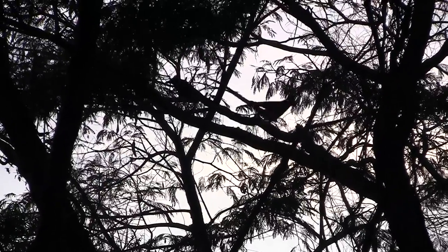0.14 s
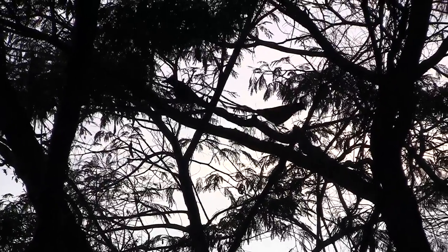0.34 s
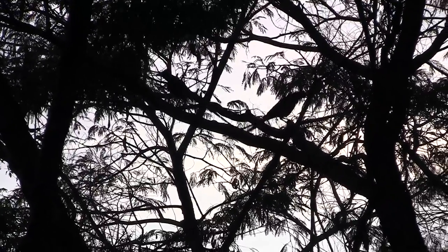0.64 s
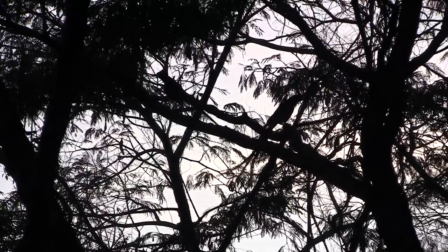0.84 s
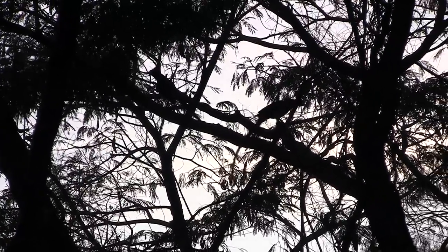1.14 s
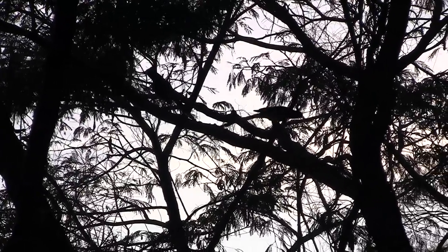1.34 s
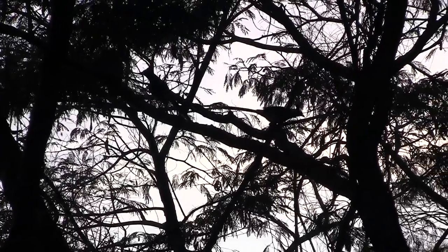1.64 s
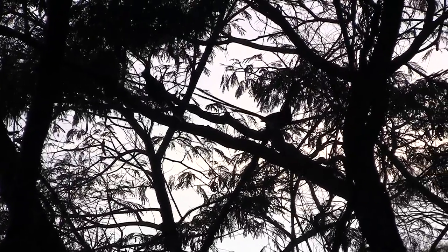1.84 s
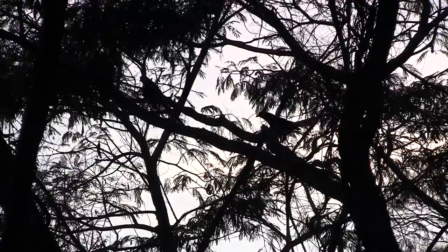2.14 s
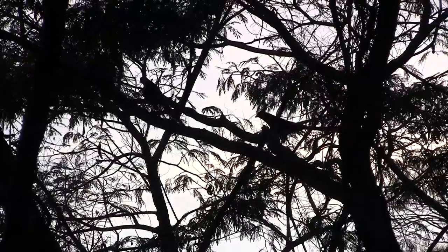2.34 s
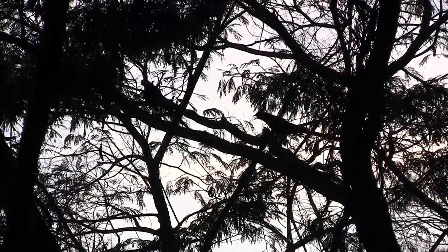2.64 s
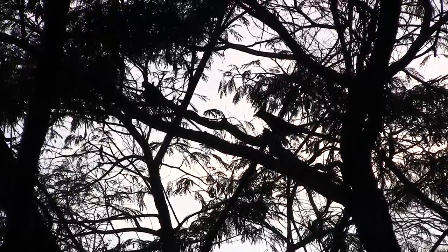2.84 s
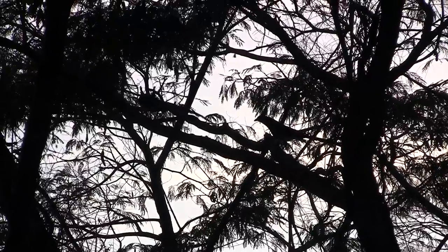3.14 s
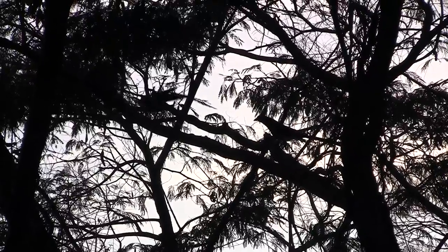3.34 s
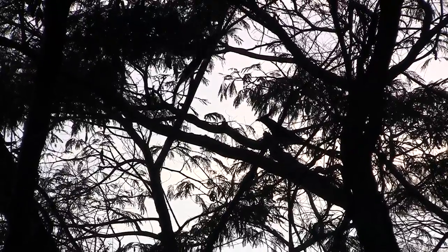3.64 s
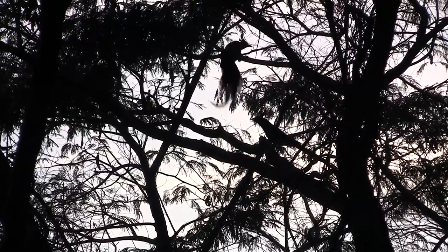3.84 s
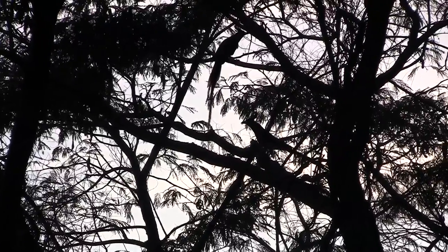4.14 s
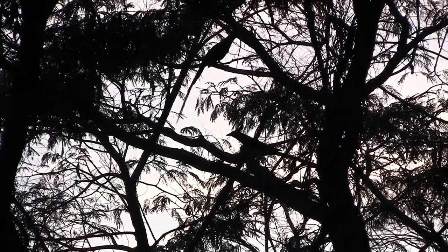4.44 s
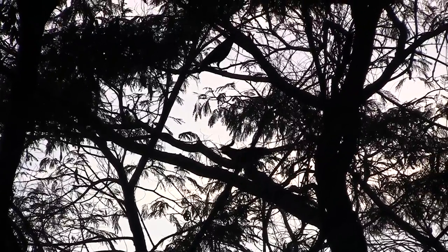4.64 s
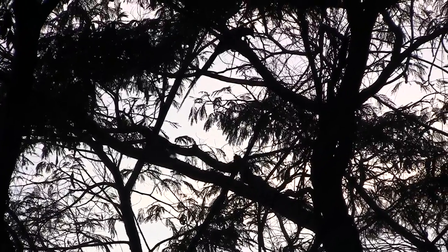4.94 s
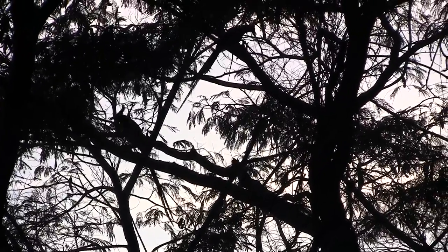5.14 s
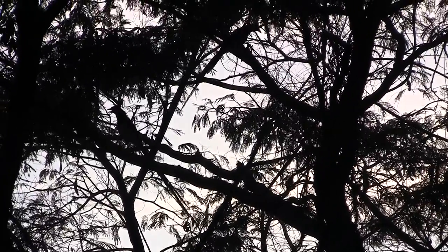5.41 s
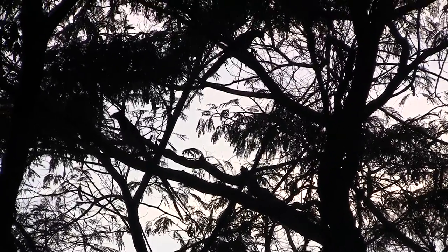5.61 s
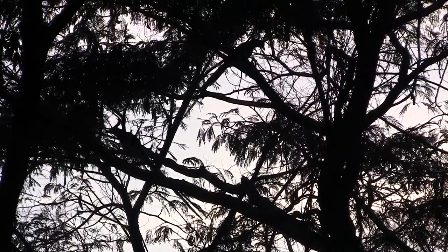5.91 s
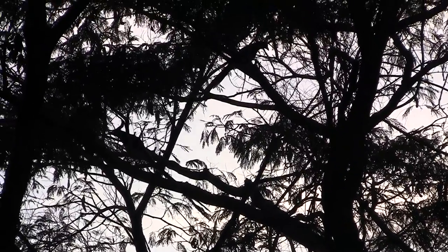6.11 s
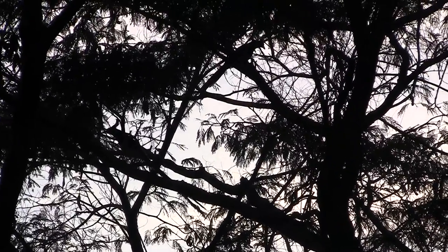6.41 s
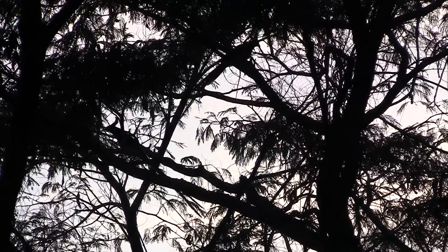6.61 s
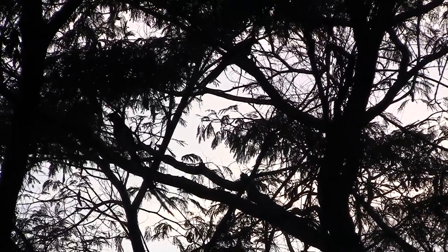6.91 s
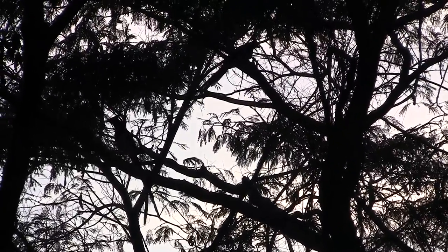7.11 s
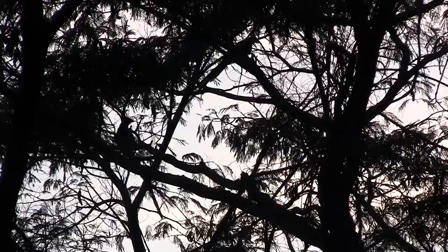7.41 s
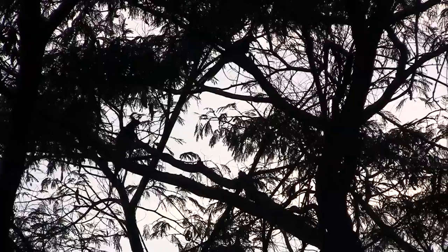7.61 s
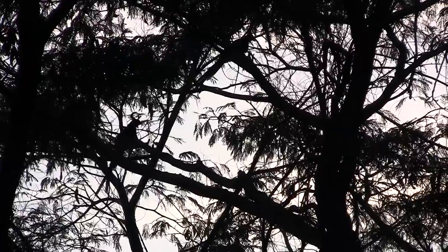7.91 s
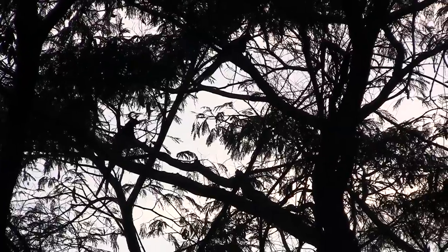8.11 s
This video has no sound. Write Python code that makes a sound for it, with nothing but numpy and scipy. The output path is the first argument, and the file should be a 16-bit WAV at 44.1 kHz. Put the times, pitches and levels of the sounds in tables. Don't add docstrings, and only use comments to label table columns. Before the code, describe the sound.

A bird gives short harsh squawks every second or so among trees, with faint far metallic clanks and a soft outdoor hush.

```python
import sys
import numpy as np
from scipy import signal
from scipy.fft import rfft, irfft, next_fast_len
from scipy.io import wavfile
from scipy.ndimage import uniform_filter1d, map_coordinates

SR = 44100
rng = np.random.default_rng(int(sys.argv[2]) if len(sys.argv) > 2 else 0)


def store_pcm(level_fs):
    pcm = np.round(np.clip(level_fs, -1, 1) * 32767).astype(np.int16)
    wavfile.write(sys.argv[1], SR, np.atleast_2d(pcm).T)


def magnitude_from_level(level_db):
    exponent = np.asarray(level_db, float) / 20
    return 10 ** exponent


N = 364266


def unit(x):
    return x / np.sqrt(np.mean(x ** 2) + 1e-20)


def along(points, hz):
    f, v = np.transpose(points)
    return np.interp(np.log(hz + 1), np.log(f + 1), v)


def filtered(x, response):
    size = next_fast_len(x.shape[-1] + 4096)
    spectrum = rfft(x, size) * response(np.fft.rfftfreq(size, 1 / SR))
    return irfft(spectrum, size)[..., :x.shape[-1]]


def resonances(modes):
    def mode(f, hz, width, db):
        return magnitude_from_level(db) * 1j * f * width / (hz * hz - f * f + 1j * f * width)
    return lambda f: sum((-1) ** k * mode(f, *settings) for k, settings in enumerate(modes))


def steep(low_hz, high_hz):
    return lambda f: (1j * f / low_hz / (1 + 1j * f / low_hz) / (1 + 1j * f / high_hz)) ** 4


def moving_resonance(x, hz, width_hz):
    turn = np.exp(2j * np.pi * np.cumsum(hz) / SR)
    keep = np.exp(-np.pi * width_hz / SR)
    return np.real(signal.lfilter([1], [1, -keep], x / turn) * turn)


def add(out, x, s):
    at = round(s * SR)
    x = x[:, max(-at, 0):N - at]
    out[:, max(at, 0):][:, :x.shape[1]] += x


def sides(pan_db):
    return magnitude_from_level(np.array([pan_db / 2, -pan_db / 2]).reshape(2, -1))


def hush():
    # (f/Hz, level/dB per Hz)
    air_curve = [(15, -62), (25, -26), (48, -15), (80, -9.5), (188, -2), (340, -3.5), (742, -8),
                 (804, -9.5), (872, -8.5), (1020, -10.5), (6050, -20.5), (14300, -33), (15500, -43)]
    air = filtered(rng.standard_normal((2, N)), lambda f: magnitude_from_level(along(air_curve, f)))
    air[0] += 0.088 * air[1]
    breathing_db = 0.5 * map_coordinates(rng.standard_normal(size=30), [np.arange(N) * 3 / SR])
    return magnitude_from_level(-55 + 3 + breathing_db) * unit(air) * sides(-0.78)


def clanks(out):
    # (t/s, ring level/dB, spray level/dB, tilt/dB per octave, t60/s)
    taps = [(0.5275, -43, -41.5, -0.7, 0.28), (0.861, -52, -43.5, 0.5, 0.23), (1.302, -47, -44, -2, 0.4),
            (3.635, -55.5, -43, 0, 0.25), (4.2085, -44, -47, -2, 0.19), (6.2509, -49, -42.5, 3, 0.27),
            (6.784, -47, -47.5, .1, 0.26), (7.396, -49.5, -47, -1, 0.18), (.897, -62, -52, 10, .04),
            (3.803, -58, -51, 2, 0.11), (6.699, -58, -51.5, -3, 0.1)]
    # (f/Hz, level/dB)
    metal = [
        [(1490, -1.5), (2050, 3.5), (3340, -2), (5700, -4), (7860, -3)],
        [(3430, 9), (4280, 7), (7870, -11)],
        [(2390, -2), (5400, 8)],
        [(1490, 5), (2050, 12), (3340, 5.5), (4280, 4.5), (7870, 5)],
        [(991, -2), (1530, -0.5), (2750, -11), (3980, -3), (5380, 3)],
        [(2390, 4), (3330, 9), (4280, 9.5), (5420, -9), (7870, -18)],
        [(2270, 1), (3350, -7), (4660, -6), (7780, -4)],
        [(991, -1), (1520, 3.5), (2090, 1), (3840, -1), (5380, 3.5)],
        [(11300, 5)],
        [(7300, 4)],
        [(3650, .1)],
    ]
    # (f/Hz, level/dB per Hz)
    spray_curve = [(500, -22), (1200, -6), (3000, -3), (5000, -6.5), (8000, -14), (12000, -18),
                   (15500, -33)]
    t = np.arange(SR // 2) / SR

    def blur():
        return np.cumsum(rng.normal(0, 0.012, (2, len(t))), axis=1) + rng.random((2, 1))

    for (s, ring_db, spray_db, tilt_db, t60), modes in zip(taps, metal):
        spray = rng.standard_normal((3, len(t)))
        spray = spray[1:] + 0.77 * spray[0]
        tilted = lambda f: magnitude_from_level(along(spray_curve, f) + tilt_db * np.log2(f / 3000 + 0.1))
        broad = unit(filtered(spray, tilted))
        ring = 0
        for hz, db in modes:
            dying = magnitude_from_level(db - 0.019 * hz * t)
            ring = ring + dying * np.sin(2 * np.pi * (hz * t + blur()))
        shape = magnitude_from_level(-60 * t / t60) * (1 - np.exp(-t / (0.0059 * t60)))
        clank = shape * (magnitude_from_level(ring_db) * ring + magnitude_from_level(spray_db) * broad)
        add(out, clank * sides(0.8), s)


def bumps(out):
    # (t/s, peak level/dB, f/Hz, left-right/dB)
    touches = [(.163, -42, 80, 11), (2.238, -47, 120, 9), (2.265, -44, 90, 9), (2.457, -32.5, 101, 9),
               (2.49, -44, 100, 12), (2.526, -43, 100, 13), (3.191, -36, 107, 8), (3.329, -35, 96, 14),
               (3.983, -42.5, 84.4, 10)]
    t = np.arange(SR // 20) / SR
    for s, db, hz, pan_db in touches:
        u = t * hz / 0.87
        push = u * np.exp(1 - u ** 1.6) * np.sin(2 * np.pi * hz * t)
        add(out, magnitude_from_level(db) * push * magnitude_from_level([[0], [-pan_db * 2.0]]), s - 0.006)


def tick(out):
    bright = lambda f: 0.3 + 1j * f / 6000 / (1 + 1j * f / 6000)
    click = filtered(np.eye(1, 200)[0], bright)
    add(out, magnitude_from_level(-34) * click * sides(8), 6.3345)


def tail(t60, level, size):
    hz, t, z = signal.stft(rng.standard_normal((2, size)), SR, nperseg=256)
    field = signal.istft(z * magnitude_from_level(-60 * t / t60(hz)[:, None]), SR, nperseg=256)[1]
    return filtered(field / np.linalg.norm(field[0]), lambda f: magnitude_from_level(along(level, f)))


def among_trees(voice, pan_db, wood_db=0):
    # (f/Hz, level/dB)
    leaf_curve = [(700, -19), (1500, -5.5), (2500, -7.5), (3500, 6), (6000, -2.5), (14000, 0.5)]
    # (f/Hz, t60/s)
    wood_t60 = [(500, 0.11), (1500, 0.6), (2250, 1.25), (2600, 1.1), (2950, 0.9), (5000, 0.67),
                (10000, 0.55)]
    # (f/Hz, level/dB)
    wood_curve = [(700, -4), (1500, -16), (2250, -21.5), (2600, -21), (2950, -13), (4200, 0), (6000, -10),
                  (8000, -12), (14000, -5)]
    voice = np.pad(voice, (0, SR))
    pan_db = np.pad(pan_db, (0, SR), "edge")
    near = tail(lambda hz: 0.053 + 0 * hz, leaf_curve, size=4096)
    near = near[0] * np.array([[1], [-1]]) + 0.69 * near[1]
    far = tail(lambda hz: along(wood_t60, hz), wood_curve, size=SR)
    far = np.pad(far, ((0, 0), (round(0.0086 * SR), 0)))
    echo = lambda field: signal.fftconvolve(voice[None], field, axes=1)[:, :len(voice)]
    return (voice + echo(near)) * sides(pan_db) + magnitude_from_level(wood_db) * echo(far) * sides(3.8)


def notes(out):
    # (t/s, level/dB)
    openings = [(1.32, -47.5), (2.745, -47.5), (3.845, -47), (4.743, -44), (5.56, -44.5), (6.951, -46.5)]
    # (t/s, end f/Hz, level/dB)
    closings = [(.026, 823, -43), (1.433, 476, -41.5), (2.854, 546, -39.5), (3.951, 467, -45),
                (4.848, 533, -42), (5.675, 525, -39)]
    # (t/s, length/s, start f/Hz, end f/Hz, level/dB)
    others = [
        (0.646, 0.035, 859, 930, -42.5),
        (0.722, 0.055, 1067, 930, -44),
        (.768, 0.02, 823, 423, -47.5),
        (4.059, 0.07, 790, 1540, -49.5),
        (7.118, 0.017, 1150, 1165, -39),
    ]
    rising = [(s, 0.016, 725, 990, db) for s, db in openings]
    falling = [(s, 0.028, 990, to_hz, db) for s, to_hz, db in closings]
    for s, length, from_hz, to_hz, db in rising + falling + others:
        u = np.arange(0, 1, 1 / (length * SR))
        phase = 2 * np.pi * np.cumsum(from_hz + (to_hz - from_hz) * u ** 1.755) / SR
        tone = np.sin(phase) + magnitude_from_level(-26) * np.sin(2 * phase)
        note = magnitude_from_level(db + 2) * np.sin(np.pi * u) ** 0.072 * tone
        add(out, among_trees(note, 0 * u)[:, :SR // 2], s)


def evened(x, amount, size=500):
    strength = np.sqrt(np.abs(uniform_filter1d(x ** 2, size=size)) + 1e-9)
    return unit(x / strength ** amount)


def flutter(size, rate_hz, jitter, scatter_db, breath):
    draw = rng.standard_normal((size // 5, 2))
    at = np.cumsum(SR / rate_hz * np.exp(jitter * draw[:, 0])).astype(int)
    slaps = np.bincount(at, magnitude_from_level(scatter_db * draw[:, 1]), size)[:size]
    gate = signal.lfilter([1], [1, -np.exp(-1 / (0.0024 * SR))], slaps)
    turbulence = unit(gate * rng.standard_normal(size))
    return evened(unit(slaps - slaps.mean()) + breath * turbulence, amount=0.34, size=130)


def controls(t, length, effort_db, attack, release, throat_hz, dip, rise, strain_db, swell_db):
    u = np.clip(t / length, 0, 1)
    letting_go = np.clip((t - length) / release, 0, 1)
    early_db = 18.5 * np.clip(1 - t / attack, 0, 1) ** 1.9
    late_db = 22 * letting_go ** 0.73
    weak_db = early_db + late_db
    strain = np.clip(1 - np.abs(u - 0.51) / 0.39, 0, 1)
    push_db = strain_db * strain
    effort = effort_db + swell_db * (u - 0.5) - weak_db - 0.33 * push_db
    bend_percent = rise * u - dip * strain + 0.32 * early_db + 0.17 * late_db
    throat = throat_hz * (1 + bend_percent / 100)
    chest = -16.5 + 0.98 * push_db + 0.34 * weak_db
    rasp = -10.5 + 0.62 * push_db + 0.18 * weak_db
    pan = 3.5 - 0.13 * push_db - 9 * letting_go
    lip = 2.2 * push_db + 0.55 * weak_db - 17 * u
    ring = -8.5 - 0.66 * push_db
    return effort, throat, chest, rasp, pan, lip, ring


def squawks(out):
    # (t/s, sounding until release/s, effort level/dB, attack/s, release/s)
    calls = [
        (-.09, .13, -21, .03, 0.02),
        (.643, 0.088, -18.5, 0.054, 0.05),
        (1.318, 0.12, -19, 0.027, .036),
        (2.743, 0.11, -21.5, .032, 0.04),
        (3.839, 0.11, -18, 0.041, 0.038),
        (4.739, 0.12, -19.5, 0.028, 0.013),
        (5.559, .11, -17, 0.033, 0.042),
        (6.946, 0.18, -18.5, 0.027, 0.032),
    ]
    # (f/Hz, dip under strain/%, rise to the end/%, mid-call strain/dB, swell/dB)
    throats = [(2436, .1, -0.3, 3.7, -7), (2553, 7.6, -1.5, 1.1, 3), (2578, 6.5, 2, 2.5, 1.8),
               (2625, 3.5, -2.5, 10, 2), (2590, 0.7, -0.5, 5.5, 2), (2503, 3.5, 0, 11, 1),
               (2518, 9.5, 7, 4.5, 2.5), (2647, 6, -8, 9.5, -3.5)]
    # (windpipe f/Hz, windpipe level/dB, shoulder f/Hz, shoulder level/dB, lip level/dB)
    gapes = [(930, 3, 2970, -14.5, -3), (927, 4, 2740, -11, -16), (930, -0.5, 2200, -20.5, -14),
             (893, 3, 2720, -5, -18), (930, -1.5, 2400, -13, -15), (893, 0, 2980, -13.5, -14.5),
             (930, -0.5, 3040, -13.5, -7), (1150, 5, 1910, -7.5, -14)]
    # (f/Hz, lift/dB, facing/dB per octave, level into the wood/dB, rasp level/dB)
    beaks = [(4930, 4, 2, 0.2, 0.5), (6300, 5.5, 0.2, -0.5, 0.5), (5950, 6.5, -0.7, 0.1, 2),
             (4870, 5.5, -1, -0.1, 3.5), (4730, 7, 1.5, 1.4, -0.8), (5800, 5, 1.5, 0.9, -2.5),
             (5140, 5.5, 0.3, 0.7, -1), (6460, 2.5, -3.5, 0.5, 1.5)]
    # (f/Hz, width/Hz, level/dB)
    chest_mode = [(1372, 134, 0.1)]
    # (f/Hz, width/Hz, level/dB)
    lip_mode = [(2057, 114, 0.1)]
    # (f/Hz, level/dB per Hz)
    rasp_curve = [(2240, -29), (3800, 3), (4220, -2), (5310, 4), (6610, 3), (7210, -1), (8810, -4),
                  (9850, -14.5), (11600, -14.5), (13500, -33), (14800, -36), (15500, -51)]
    t = np.arange(SR // 4) / SR
    through = lambda x, modes: unit(filtered(x, resonances(modes)))

    for (start, *call), bend, gape, beak in zip(calls, throats, gapes, beaks):
        pipe_hz, pipe_db, shoulder_hz, shoulder_db, mouth_db = gape
        beak_hz, lift_db, tilt_db, wood_db, harsh_db = beak
        effort_db, throat_hz, chest_db, rasp_db, pan_db, lip_db, ring_db = controls(t, *call, *bend)
        drive = flutter(len(t), rate_hz=1500, jitter=0.5, scatter_db=1.0, breath=1.42)

        throat = moving_resonance(drive, throat_hz, width_hz=300)
        throat = moving_resonance(throat, throat_hz, width_hz=1500)
        core = evened(moving_resonance(throat, throat_hz, width_hz=46), amount=0.25)
        throat = evened(unit(throat) + magnitude_from_level(ring_db) * core, amount=0.33)
        throat += magnitude_from_level(shoulder_db) * through(drive, [(shoulder_hz, 700, 0)])
        throat += magnitude_from_level(lip_db + mouth_db) * evened(through(drive, lip_mode), amount=1.0)

        pipe = through(through(drive, [(pipe_hz, 120, 0)]), [(pipe_hz, 300, 0)])
        chest = through(through(drive, chest_mode), [(1370, 280, 0)]) + magnitude_from_level(pipe_db - 9.5) * pipe
        body = filtered(throat, steep(low_hz=953, high_hz=6740)) * magnitude_from_level(1) + magnitude_from_level(chest_db - 3.5) * chest

        second = flutter(len(t), rate_hz=1700, jitter=0.5, scatter_db=3.0, breath=1.6)
        peak_db = lambda f: lift_db / (1 + ((f - beak_hz) / 600) ** 2)
        facing_db = lambda f: tilt_db * np.log2(f / 6000 + 0.1)
        rasp = unit(filtered(second, lambda f: magnitude_from_level(along(rasp_curve, f) + peak_db(f) + facing_db(f))))

        voice = magnitude_from_level(effort_db) * (magnitude_from_level(0.5) * body + magnitude_from_level(rasp_db + harsh_db - 3.5) * rasp)
        voice = filtered(voice, lambda f: 1 / np.sqrt(1 + (0.9 * pipe_hz / (f + 1)) ** 16))
        waking = np.clip(t / 0.0046, 0, 1)
        stopping = np.clip((call[0] + call[-1] - t) / 0.0042, 0, 1)
        add(out, among_trees(voice * waking * stopping, pan_db, wood_db), start)


def scene():
    out = hush()
    for source in (squawks, notes, clanks, bumps, tick):
        source(out)
    return out


def roll_off(x):
    return signal.sosfilt(signal.butter(12, 15660, fs=SR, output="sos"), x)


def record(dry):
    mix = filtered(dry, steep(low_hz=16, high_hz=2e5))
    return roll_off(mix)


dry = scene()
out = record(dry)
store_pcm(out)
```